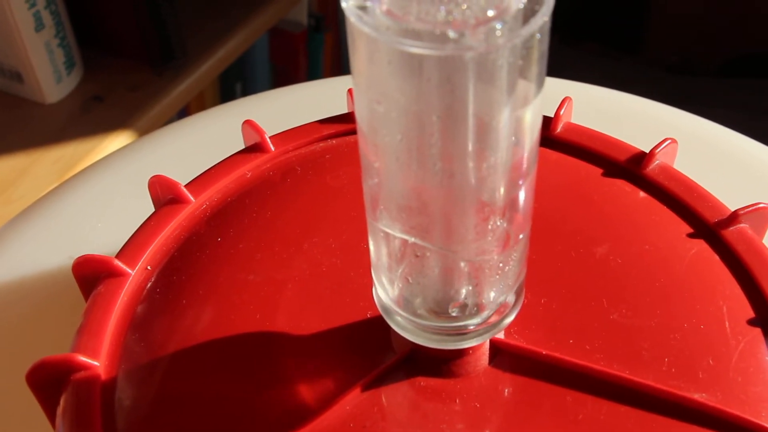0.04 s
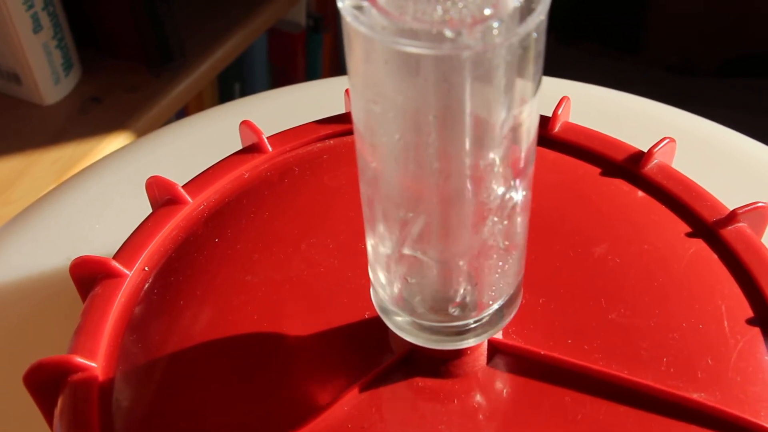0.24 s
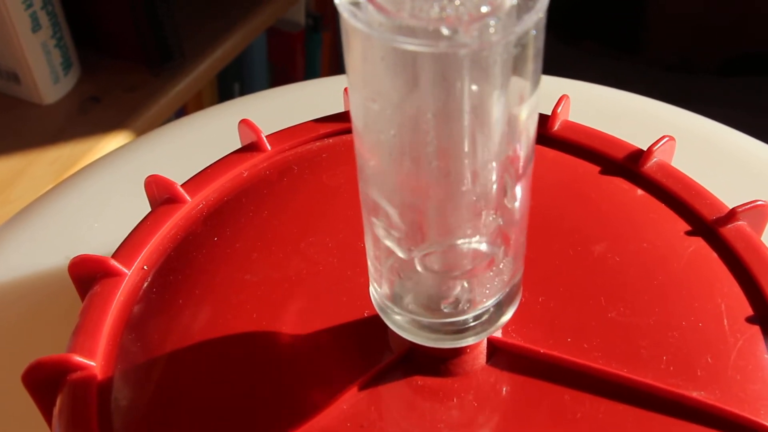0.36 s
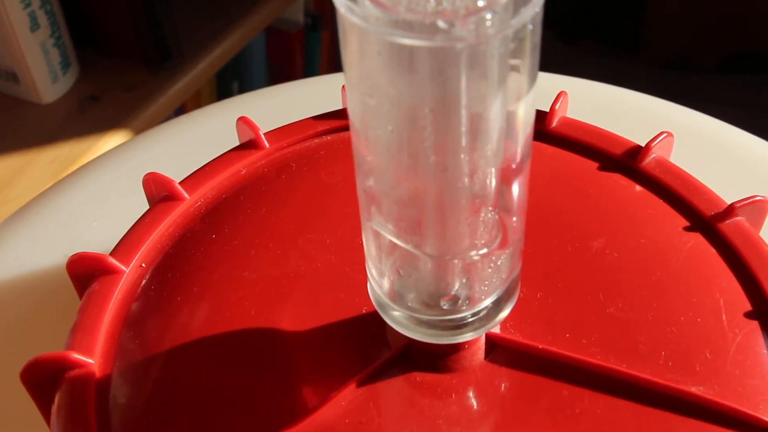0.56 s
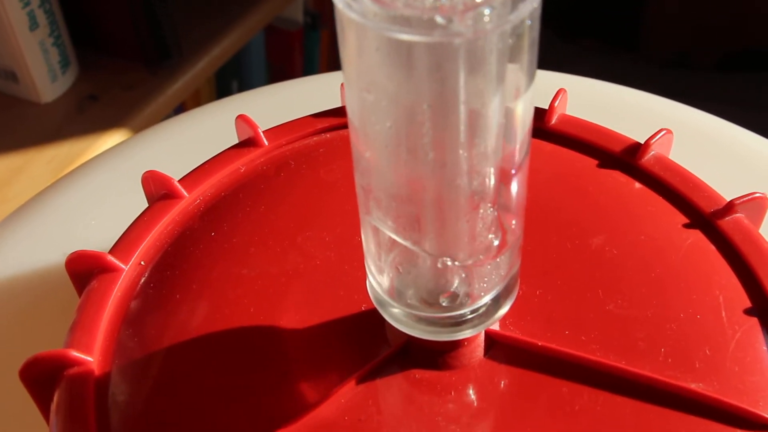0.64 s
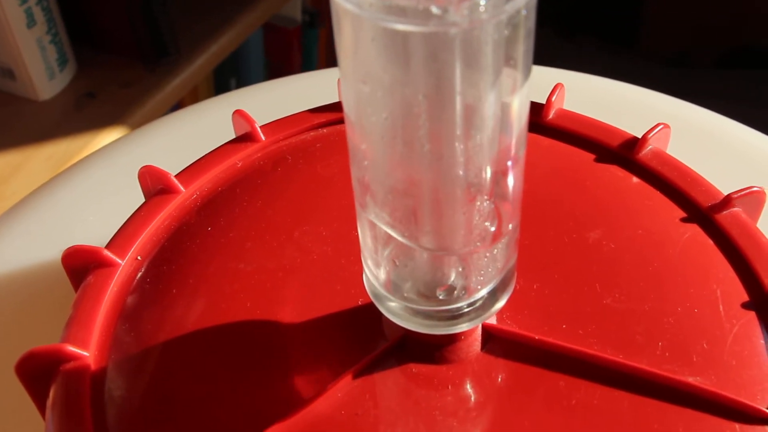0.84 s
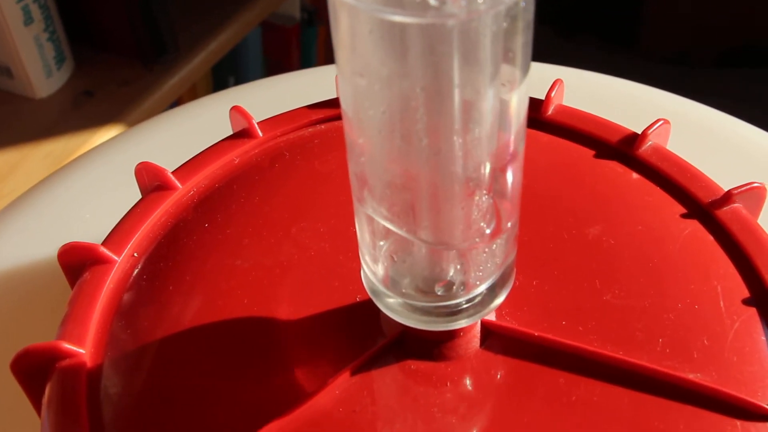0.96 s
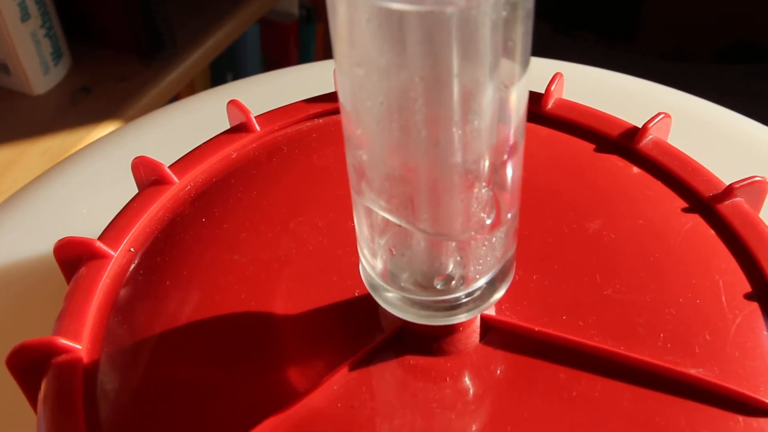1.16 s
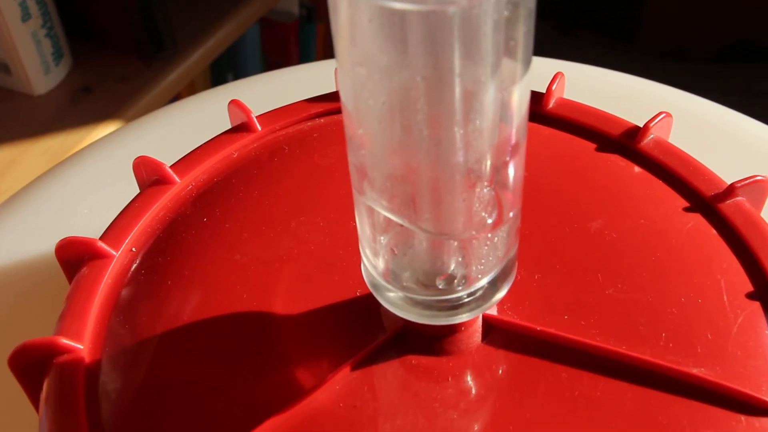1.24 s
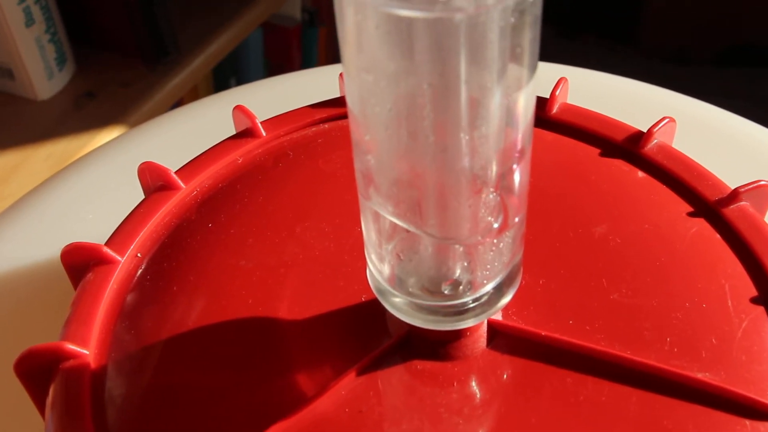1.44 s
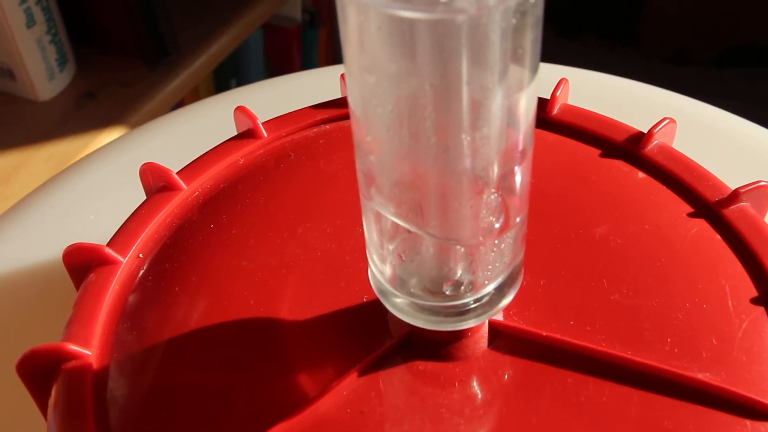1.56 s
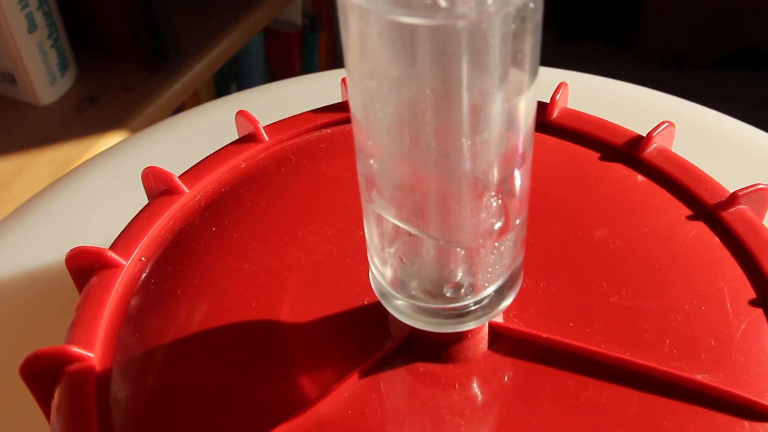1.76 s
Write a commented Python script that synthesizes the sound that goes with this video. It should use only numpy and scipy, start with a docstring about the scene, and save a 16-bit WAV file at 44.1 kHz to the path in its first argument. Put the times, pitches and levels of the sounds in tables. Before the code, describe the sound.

A fermentation airlock bubbles in two quick runs, then plastic clicks in a quiet room.

```python
"""Gas gurgles through the water in a plastic airlock on a fermenting bucket, close by in a quiet room.
In two quick runs and a few weak stragglers, bubbles blip as they tear loose and excite the airlock's
cavity resonances; their skins burst and spatter the tube, and the air under the lid throbs.
Then come one sharp plastic click and some faint ones, a soft low bump and a brief rustle.
Beneath it all lie room tone, a low hum, a swelling wash of noise and a faint wavering drone."""
import sys
import numpy as np
from scipy import signal
from scipy.fft import rfft, irfft
from scipy.io import wavfile

SR = 44100
rng = np.random.default_rng(int(sys.argv[2]) if len(sys.argv) > 2 else 0)


def store_pcm(level_fs):
    """Save levels as 16-bit WAV."""
    pcm = np.round(np.clip(level_fs, -1, 1) * 32767).astype(np.int16)
    wavfile.write(sys.argv[1], SR, np.atleast_2d(pcm).T)


N = 79380
T = np.arange(N) / SR

# Reverberation of the room. Each row: frequency in Hz, time to decay by 60 dB (T60) in seconds.
ROOM_DECAY = [(100, 0.18), (600, 0.4), (2000, 0.32), (4000, .42), (8000, 0.4), (15000, 0.17)]
# Likeness of the noise at the two ears. Each row: frequency in Hz, correlation.
EAR_COHERENCE = [(30, 0.87), (120, 0.33), (300, 0.23), (800, 0), (2000, 0), (5000, 0), (15000, 0)]
# Spectra of the background noises. Each row: frequency in Hz, relative level in dB.
ROOM_TONE_SPECTRUM = [(20, -13), (45, -1), (62, 1.5), (85, -2), (120, 2), (160, -4), (220, -0.5), (300, -3),
                      (420, -5), (650, -4), (900, -9.5), (1800, -12), (4300, -13), (9000, -19.5),
                      (15500, -26.5)]
WASH_SPECTRUM = [(30, -35), (100, -15), (300, -5), (420, 0), (560, 1), (720, -5.5), (950, -3.5),
                 (1500, -9.5), (2300, -10.5), (3500, -22.5), (15000, -43)]
RUSTLE_SPECTRUM = [(30, -34), (100, 8.5), (350, 4), (1200, -1.5), (2500, -4), (5000, -12), (9000, -23),
                   (15000, -46)]
# Envelopes of the wash and the rustle. Each row: time in seconds, level in dB.
WASH_ENVELOPE = [(0, -60), (.5, -58.5), (.68, -56), (.8, -53), (.93, -54), (1.1, -56.5), (1.25, -61),
                 (1.5, -64), (1.65, -67), (1.8, -66.5)]
RUSTLE_ENVELOPE = [(1.3, -80), (1.365, -50), (1.42, -57), (1.45, -54), (1.5, -57.5), (1.62, -66)]
# Course of the drone's lower band. Each row: time in seconds, pitch in Hz, level in dB.
DRONE_PATH = [(.5, 479.4, -70), (.66, 440, -60), (.79, 392, -57), (0.921, 378, -59), (1.099, 415.4, -68.5),
              (1.3, 400, -72)]
# Dry plastic clicks. Each row: start in seconds, then levels of snap, body and ring in dB.
PLASTIC_CLICKS = [(0.989, -51.5, -68, -58), (1.0256, -40, -44, -31.5), (1.028, -32.5, -42.5, -45),
                  (1.443, -55.5, -50.5, -53), (1.643, -59, -50.5, -76), (1.717, -55.5, -49, -72),
                  (1.7818, -45.5, -47, -51), (1.7871, -59, -46, -59)]
# Spectra of a click's snap and body and of the spray. Each row: frequency in Hz, relative level in dB.
SNAP_SPECTRUM = [(300, -16), (1200, -5.5), (2200, 0), (3700, 6.5), (4700, -4), (5900, 6), (7300, -7),
                 (9000, 0), (11000, -14.5), (15000, -25)]
BODY_SPECTRUM = [(100, 1), (500, 5), (1900, 19), (3500, -24), (15000, -53)]
SPRAY_SPECTRUM = [(30, -22), (100, -2), (200, 5.5), (330, 8.5), (800, 8.5), (1600, 1.5), (2500, -13),
                  (4000, -10), (6000, -16.5), (9000, -25), (15000, -31)]
# Modes of the clicking plastic, the lid with its headspace, the tube and the airlock's air space.
# Each row: frequency in Hz, relative level in dB, T60 in seconds.
PLASTIC_MODES = [(2290, -8, 0.011), (2960, -8, 0.015), (3647, 0.5, 0.014), (3920, -6, 0.017)]
LID_MODES = [(87, 6, 0.9), (125.9, 1, 0.71)]
TUBE_MODES = [(874, 0.5, 0.12), (1026, -0.5, 0.12), (1310, -7, 0.1), (1578, -1.5, 0.056),
              (1777, -2.5, 0.11), (2254, 3, 0.014), (3044, -1, .015), (3830, 3.5, 0.022),
              (4880, -6.5, 0.018), (5400, -10, 0.013), (6540, -18, 0.016)]
CHAMBER_MODES = [(520.3, -0.5, 0.31), (570.6, 1, 0.29), (642, -7, 0.67), (702, -1, .5)]
# Bubble skins bursting. Each row: start in seconds, ring pitch in Hz, ring level in dB, spray level in dB.
SKIN_BURSTS = [(0.209, 2760, -48, -48.5), (0.209, 1720, -48, -50.5), (.220, 1780, -38.5, -60),
               (.254, 1494, -42, -42), (.263, 1426, -35.5, -43), (0.272, 1370, -35, -40),
               (.276, 1612, -32.5, -36.5), (.278, 3860, -46, -46), (0.28, 2130, -38.5, -55),
               (.286, 857, -34, -40.5), (0.288, 2880, -43, -44.5), (0.303, 3200, -51, -55),
               (0.338, 1590, -43.5, -58), (.341, 948, -32, -72), (.351, 900, -34.5, -61),
               (0.371, 1083, -34, -44), (0.372, 4110, -47, -68), (0.381, 1710, -32.5, -37.5),
               (0.384, 2996, -40, -44), (.385, 1020, -24.5, -44), (.396, 1914, -28.5, -42),
               (.397, 1145, -21, -46.5), (0.405, 1122, -31, -44), (.416, 2200, -47, -49),
               (0.427, 1350, -42, -42), (.440, 1490, -33.5, -44.5), (.448, 1020, -56, -51),
               (.492, 1660, -72, -58), (0.609, 2606, -48.5, -73), (1.528, 1010, -51, -61)]
# Pushes of gas under the lid, and bubbles tearing loose in the water.
# Each row: start in seconds, pitch in Hz, level in dB, time to peak in seconds.
GAS_PUSHES = [(0.2108, 122, -43, 0.017), (0.2434, 110.3, -34, 0.0143), (0.342, 98, -41.5, 0.017),
              (0.3764, 105.4, -35.5, 0.012), (0.4133, 114.7, -37.5, 0.015), (0.437, 119.3, -36.5, 0.014),
              (0.5758, 116.4, -54, 0.014)]
BUBBLE_RELEASES = [(0.1333, 647, -45.5, 0.0026), (0.1391, 626, -48.5, 0.0048), (0.1502, 640, -46.5, 0.0065),
                   (0.167, 627, -43, 0.0038), (0.2116, 360, -35.5, 0.0016), (0.2183, 575, -36.5, 0.0042),
                   (0.2275, 585, -35.9, 0.0051), (0.2353, 608, -34.5, 0.0029), (0.2466, 632, -31, 0.0027),
                   (0.2538, 607, -28, 0.0033), (0.2661, 570, -28, 0.0048), (0.274, 633, -24, 0.0033),
                   (0.2828, 622, -27, 0.0025), (0.2896, 630, -39, 0.0038), (0.3032, 587, -37, 0.0033),
                   (0.3347, 584, -31.5, 0.0022), (0.3438, 540, -34.5, 0.0029), (0.3736, 559, -29, 0.0047),
                   (0.3899, 616.6, -24, 0.0071), (0.4037, 610, -20.5, 0.0059), (0.4148, 633, -24.5, 0.0029),
                   (0.4291, 589, -23, 0.0041), (0.4447, 598, -32.5, 0.0055), (0.455, 584, -37.5, 0.0075),
                   (0.485, 602, -46, 0.0085), (0.5261, 629, -47, 0.0032), (0.5679, 550, -36.5, 0.0049),
                   (0.5821, 520, -41, 0.0025), (0.8982, 597, -37.5, 0.0028)]


def amp(db):
    """Amplitude grows tenfold for every 20 dB."""
    return 10 ** (np.asarray(db) / 20)


def unit_rms(x):
    """Normalisation to a mean power of one."""
    return x / np.sqrt(np.mean(x ** 2) + 1e-20)


def curve_at(points, hz):
    """Interpolation along a logarithmic frequency axis."""
    frequencies, values = np.transpose(points)
    return np.interp(np.log(hz + 1), np.log(frequencies), values)


def add(mix, start_s, sound):
    """Superposition: a sound adds to the mix from its start time on."""
    part = mix[max(round(start_s * SR), 0):][:len(sound)]
    part += sound[:len(part)]


def colour(x, spectrum, size=4096):
    """Minimum-phase filtering: a causal response of unit energy imposes a spectrum."""
    log_gain = np.log(amp(curve_at(spectrum, abs(np.fft.fftfreq(size, 1 / SR)))))
    response = np.exp(np.conj(signal.hilbert(log_gain)))
    taps = np.fft.ifft(response).real[:size // 2]
    return signal.fftconvolve(x, taps / np.linalg.norm(taps))[:N]


def blip(hz, swell_s, glide_per_s, shape):
    """A transient oscillation: it peaks at swell_s and dies while its pitch glides exponentially."""
    t = np.arange(0, 10 * swell_s, 1 / SR)
    envelope = (t / swell_s * np.exp(1 - t / swell_s)) ** shape
    pitch = hz * np.exp(glide_per_s * t)
    return envelope * np.sin(2 * np.pi * np.cumsum(pitch) / SR)


def ring(hz, t60, rise_s=1e-5):
    """A damped mode: a sinusoid builds up and decays exponentially."""
    t = T[:SR]
    envelope = (1 - np.exp(-t / rise_s)) * np.exp(-np.log(1000) * t / t60)
    return envelope * np.sin(2 * np.pi * hz * t)


def burst(swell_s, per_s, size=1500):
    """Shot noise: random impulses swell and die, with a total energy set by swell_s."""
    impulses = rng.choice([-1., 1.], size) * rng.uniform(0.38, 1, size)
    impulses *= rng.random(size) < per_s / SR
    impulses *= T[:size] / swell_s * np.exp(-T[:size] / swell_s)
    return impulses / (np.linalg.norm(impulses) + 1e-12) * np.sqrt(swell_s * SR / 2)


def noise(spectrum):
    """Partial coherence: coloured stereo noise, alike at the two ears only in the bass."""
    hz = np.fft.rfftfreq(N, 1 / SR)
    mid, side = rfft(rng.standard_normal((2, N)))
    coherence = curve_at(EAR_COHERENCE, hz)
    mid, side = mid * np.sqrt(1 + coherence), side * np.sqrt(1 - coherence)
    ears = np.array([mid + side, mid - side])
    return unit_rms(irfft(ears * amp(curve_at(spectrum, hz)), N))


def noise_band(hz, width_hz):
    """Random modulation spreads a tone into a narrow band of noise."""
    offset_hz = np.fft.fftfreq(N, 1 / SR)
    real, imaginary = rng.standard_normal((2, N))
    flutter = np.fft.ifft((real + 1j * imaginary) / (1 + (2 * offset_hz / width_hz) ** 2))
    carrier = np.exp(2j * np.pi * np.cumsum(hz * np.ones(N)) / SR)
    return unit_rms((flutter * carrier).real)


def cavity(x, modes):
    """Forced resonance: a sound is heard with the cavity modes that it excites."""
    response = sum(amp(db) * ring(hz, t60) * 2 * np.log(1000) / (t60 * SR) for hz, db, t60 in modes)
    return x + signal.fftconvolve(x, response)[:N]


def room(x, tail_db, near_db, near_s, pan_db):
    """Reverberation: scatter off nearby surfaces and a small room's tail follow the direct sound."""
    t = T[:SR // 2]
    hz, frame_s, spectra = signal.stft(rng.standard_normal((2, len(t))), SR, nperseg=256)
    decay = np.exp(-np.log(1000) * frame_s / curve_at(ROOM_DECAY, hz)[:, None])
    tail = signal.istft(spectra * decay, SR, nperseg=256)[1][:, :len(t)]
    tail *= t > 0.0073  # the tail arrives 7.3 ms late
    near = rng.standard_normal(tail.shape) * np.exp(-t / near_s)
    response = (amp(tail_db) * unit_rms(tail) + amp(near_db) * unit_rms(near)) / np.sqrt(len(t))
    reflections = signal.fftconvolve(x[None], response, axes=1)[:, :N]
    return (x + reflections) * amp([[pan_db / 2], [-pan_db / 2]])


def room_tone(level_db=-56):
    """Stationary broadband noise, strongest in the bass."""
    return amp(level_db) * noise(ROOM_TONE_SPECTRUM)


def hum(hz=99, rms_db=-61.5):
    """Simple harmonic motion: one steady low tone."""
    return amp(rms_db) * np.sqrt(2) * np.sin(2 * np.pi * (hz * T + rng.random()))


def wash():
    """Slow amplitude modulation: faint midrange noise swells and recedes."""
    return noise(WASH_SPECTRUM) * amp(np.interp(T, *np.transpose(WASH_ENVELOPE)))


def drone():
    """Two soft, far resonances waver as narrow-band noise; they swell together and the lower glides."""
    times, hz, db = np.transpose(DRONE_PATH)
    lower = noise_band(np.interp(T, times, hz), width_hz=34)
    upper = amp(-5.5) * noise_band(hz=903, width_hz=79)
    return amp(np.interp(T, times, db)) * (lower + upper)


def rustle(grain_s=0.004, depth_db=3):
    """Fast random amplitude modulation makes a brief swell of noise grainy."""
    grain = unit_rms(signal.lfilter([1], [1, -np.exp(-1 / (grain_s * SR))], rng.standard_normal(N)))
    texture = unit_rms(noise(RUSTLE_SPECTRUM) * amp(depth_db * grain))
    return texture * amp(np.interp(T, *np.transpose(RUSTLE_ENVELOPE)))


def bump(start_s=1.261, level_db=-35.5):
    """A soft impact: a heavily damped low oscillation that sags in pitch."""
    thud = np.zeros(N)
    add(thud, start_s, amp(level_db) * blip(hz=88, swell_s=0.018, glide_per_s=-5.5, shape=0.98))
    return thud


def clicks(echo_s=0.006, echo_db=0.5):
    """Impulse excitation: plastic snaps and rings in its modes; the nearest wall reflects the snap."""
    snap, body, tone = np.zeros((3, N))
    modes = sum(amp(db) * ring(hz, t60, rise_s=0.00048) for hz, db, t60 in PLASTIC_MODES)
    for start, snap_db, body_db, ring_db in PLASTIC_CLICKS:
        crack = burst(swell_s=0.00092, per_s=30000)
        add(snap, start, amp(snap_db) * crack)
        add(body, start, amp(body_db) * crack)
        add(tone, start, amp(ring_db) * modes)
    snap, body = colour(snap, SNAP_SPECTRUM), colour(body, BODY_SPECTRUM)
    wall = np.array([burst(swell_s=0.00085, per_s=7100) for ear in "LR"])
    echo = signal.fftconvolve(snap[None], wall / np.linalg.norm(wall[0]), axes=1)
    echo = np.pad(echo, ((0, 0), (round(echo_s * SR), 0)))[:, :N]
    return (room(snap, tail_db=5, near_db=-1.5, near_s=0.0064, pan_db=-0.2) + amp(echo_db) * echo
            + room(tone + body, tail_db=-1, near_db=0.5, near_s=0.0019, pan_db=0.5))


def lid_throb():
    """Each push of gas drives the low resonances of the lid and the air beneath it."""
    pushes = np.zeros(N)
    for start, hz, db, swell_s in GAS_PUSHES:
        add(pushes, start, amp(db) * blip(hz, swell_s, glide_per_s=0, shape=1.84))
    return cavity(pushes, LID_MODES)


def pops():
    """Film rupture: bursting skins ring briefly, and the impacts of their spray excite the tube's modes."""
    rings, drops = np.zeros((2, N))
    for start, hz, ring_db, spray_db in SKIN_BURSTS:
        add(rings, start, amp(ring_db) * ring(hz, t60=0.04, rise_s=0.0016))
        add(drops, start, amp(spray_db) * burst(swell_s=0.0027, per_s=3500))
    tube = sum(amp(db) * ring(hz, t60) for hz, db, t60 in TUBE_MODES)
    struck_tube = amp(0.5) * signal.fftconvolve(drops, tube / np.linalg.norm(tube))[:N]
    spray = amp(4) * colour(drops, SPRAY_SPECTRUM)
    return (room(rings, tail_db=-12.5, near_db=-21, near_s=0.0029, pan_db=-2.0)
            + room(struck_tube + spray, tail_db=-9.5, near_db=-8.5, near_s=0.0024, pan_db=-0.6))


def bubbles():
    """Bubble resonance: each bubble pulsates as it tears loose and sets the airlock's air space ringing."""
    blips = np.zeros(N)
    for start, hz, db, swell_s in BUBBLE_RELEASES:
        add(blips, start, amp(db) * blip(hz, swell_s, glide_per_s=0.05, shape=2))
    return room(cavity(blips, CHAMBER_MODES), tail_db=-17, near_db=-26, near_s=0.008, pan_db=-1.8)


def scene():
    """Linear superposition: the pressures of all sources add at each ear."""
    gurgle = bubbles() + pops()
    thuds = room(lid_throb() + bump(), tail_db=-21, near_db=-30, near_s=0.012, pan_db=-0.1)
    return gurgle + thuds + clicks() + hum() + wash() + rustle() + room_tone() + drone()


def record(dry):
    """Band limiting: a linear-phase low-pass filter removes the highest treble."""
    lowpass = signal.firwin(511, cutoff=15700, window=("kaiser", 9), fs=SR)
    return signal.oaconvolve(dry, lowpass[None], "same")


dry = scene()
out = record(dry)
store_pcm(out)
```